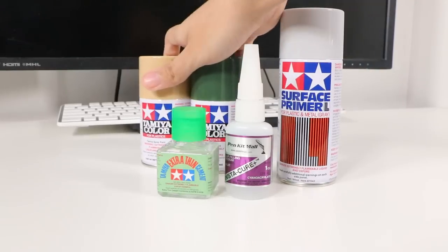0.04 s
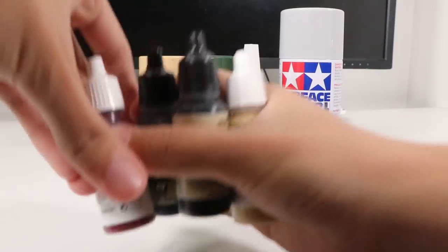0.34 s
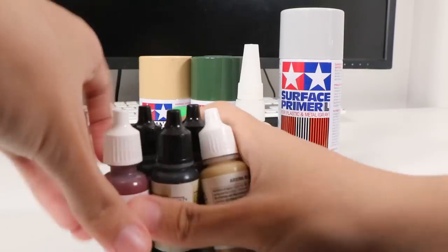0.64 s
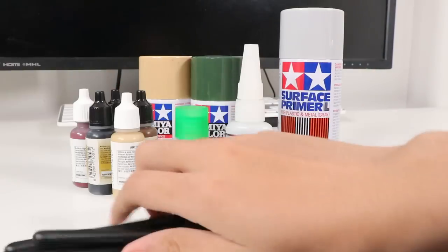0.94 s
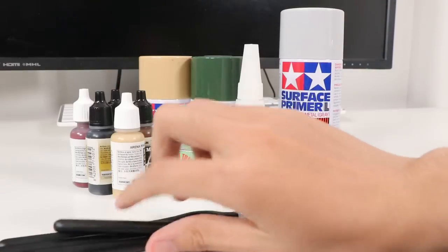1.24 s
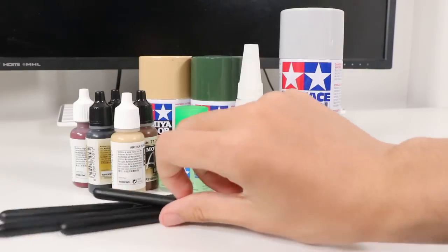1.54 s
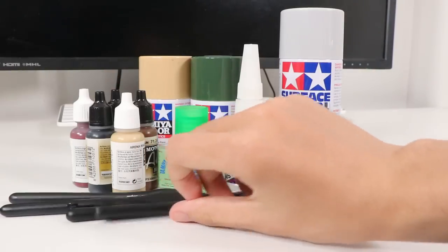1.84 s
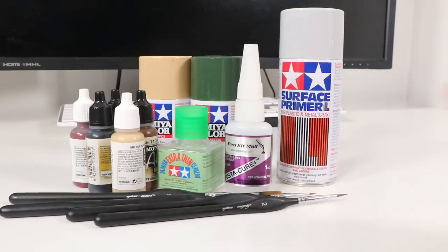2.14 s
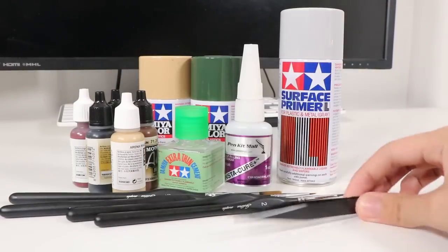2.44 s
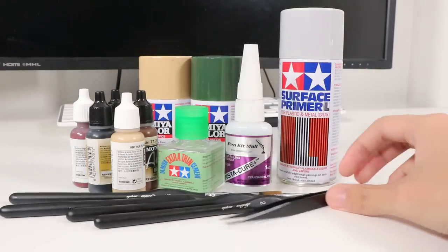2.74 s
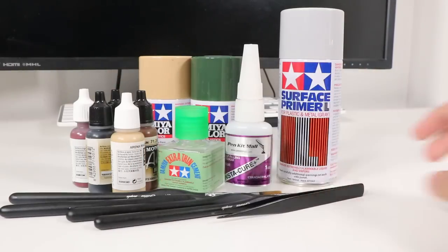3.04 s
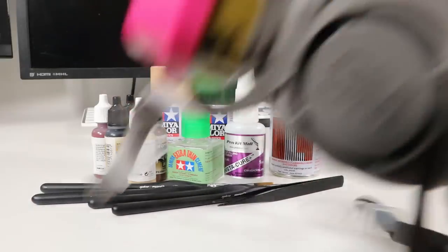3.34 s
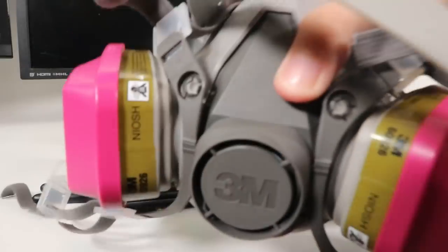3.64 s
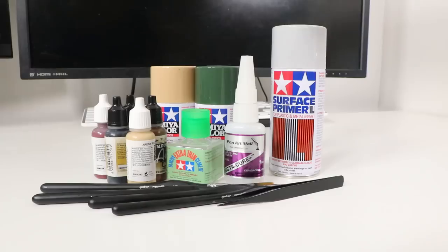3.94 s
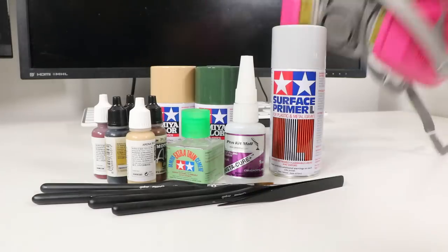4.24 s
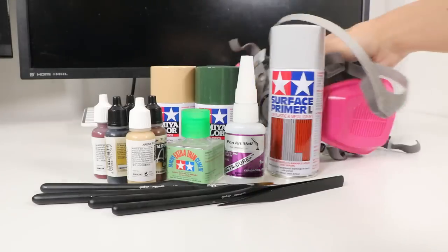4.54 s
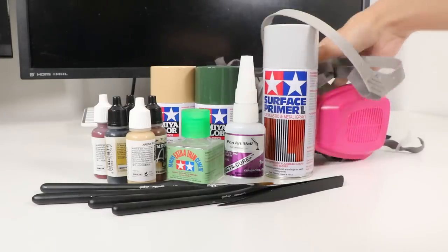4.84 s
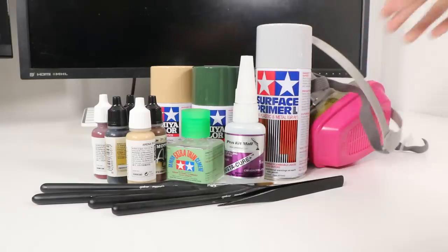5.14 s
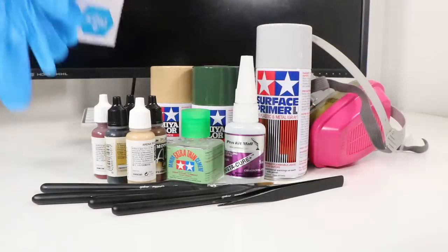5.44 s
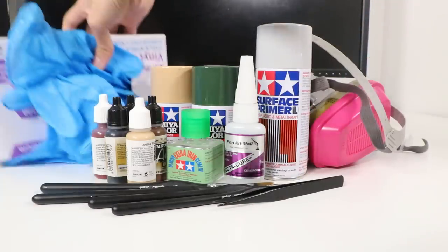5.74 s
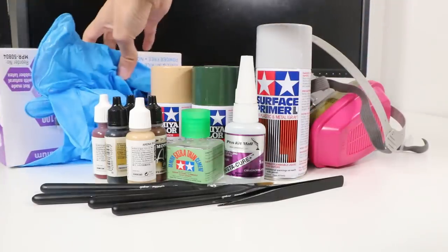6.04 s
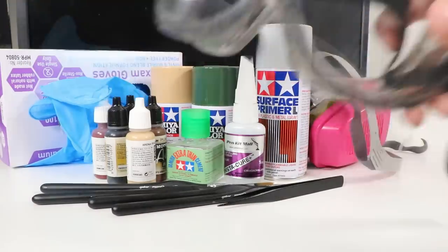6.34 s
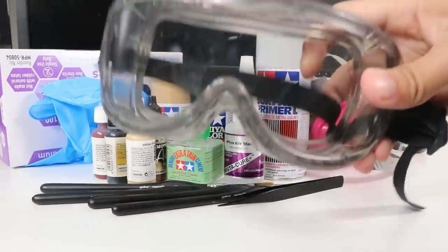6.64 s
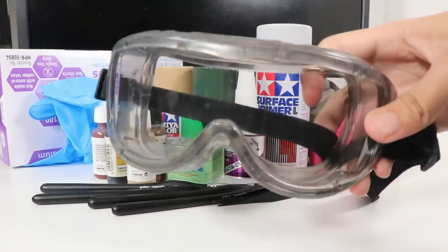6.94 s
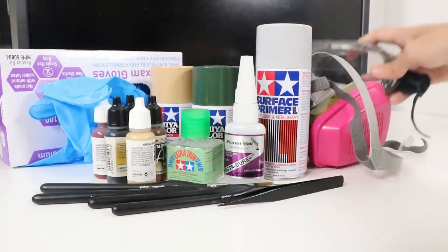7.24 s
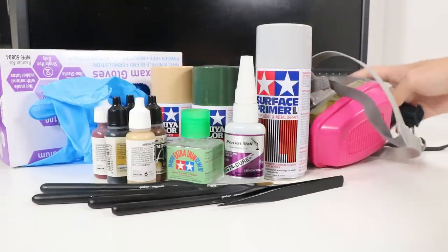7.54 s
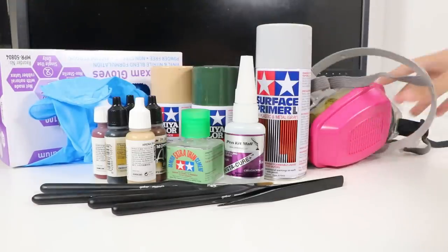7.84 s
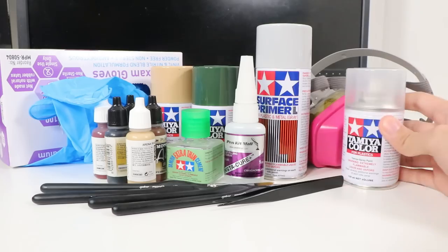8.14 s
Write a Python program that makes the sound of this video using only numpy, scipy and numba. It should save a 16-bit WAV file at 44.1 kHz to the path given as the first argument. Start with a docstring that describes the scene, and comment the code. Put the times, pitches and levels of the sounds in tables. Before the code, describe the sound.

Supplies are set on a desk near a stereo microphone in a small room, over quiet ventilation rumble. Light knocks open, then paint bottles land with a loud, dull double knock at 0.5 seconds and drag briefly. Around 1 second brush handles clatter down and slide, their metal ends ticking, with another clack near 1.9. Steel tweezers clack at 2.6, scrape and give a small high ping at 2.9. A plastic respirator taps and scrapes lightly around 3.4, then is put down from 4.4 to 5.1 with dry taps, a low drag and the hardest knock at 4.7. Rubber gloves rustle faintly until about 6.5, with a soft bump from their box at 5.8. Goggles bump and scrape lightly between 7.3 and 7.8. Just after 8 seconds a spray can's mixing ball clinks faintly, and the can knocks down at 8.2 with a short slide.

```python
"""Dull knocks on a desk come first, then brushes clatter and slide, as model-making supplies are set down
near a stereo microphone in a small room: paint bottles, brushes, tweezers, a respirator, a glove box,
goggles and a spray can. Each impact excites the damped modes of object and desk; sliding excites them
with many tiny slips. Ventilation rumbles underneath. A fast gain control flattens the room's tail
after each blow, and the first millisecond of the hardest ones clips."""
import sys
import numpy as np
from scipy import signal
from scipy.fft import rfft, irfft, next_fast_len
from scipy.io import wavfile
from numba import njit

SR = 44100
rng = np.random.default_rng(int(sys.argv[2]) if len(sys.argv) > 2 else 0)


def dump_mix(stems):
    """Bounce the given channels to the path in sys.argv[1] as a 16-bit WAV at rate SR."""
    frames = np.atleast_2d(stems).T  # one column per channel
    limited = np.clip(frames, -1, 1)  # hard clip at full scale
    pcm = np.round(limited * 32767).astype(np.int16)
    wavfile.write(sys.argv[1], SR, pcm)


N = 369999

# heavy things landing on the desk: (time [s], level [dB], centre [Hz], treble fall [dB/octave])
HEAVY_KNOCKS = [(.058, -5.5, 990, 15.5), (.076, -8.5, 590, 6.5), (.5065, 9, 420, 5.5),
                (.521, 13, 597, 11.5), (.655, -10, 380, 17), (4.562, -12.5, 480, 4), (4.630, 1.5, 382, 5.5),
                (4.7355, 19, 740, 9.5), (5.035, 0, 240, 8.5), (5.847, -11, 726, 8), (5.86, -19.5, 189, 10),
                (8.2139, 9, 1140, 11.5)]
# light impacts: (time [s], level [dB], treble fall [dB/octave])
HANDLE_CLACKS = [(.9374, 2.5, 5), (.9416, 4.5, 9.5), (.9857, 2.5, 5), (1.0086, 5, 7.5), (1.0615, 0.5, 20),
                 (1.9111, -13.5, 36), (1.9417, 1.5, 7), (1.9744, -10, 5.5)]  # brush handles dropping on the desk and on each other
TWEEZER_CLACKS = [(2.5834, 4.2, 14.1), (2.655, 6.7, 7.5), (2.687, 1.7, 8)]  # steel tweezers laid flat
TWEEZER_PINGS = [(2.873, -12.5, 4)]  # the tweezers as the fingers let go
PLASTIC_TAPS = [(3.3864, -3, 6), (3.4213, -5.5, 13.5), (3.6108, -12.5, 9.5), (4.2416, -22.5, 1),
                (4.3227, -20, 10), (4.415, -7.5, 5), (4.5816, 4, 9), (4.6759, 0.5, 6), (4.9393, 2, 18),
                (4.953, -2, 8.5), (4.9857, -1, 7.5), (5.642, -43.5, -1), (5.754, -38, 4)]  # respirator shells and buckles, gloves snapping
GOGGLE_BUMPS = [(7.312, -21.5, 7.5), (7.407, -27, 8.5), (7.429, -31.5, 3.5), (7.572, -29.5, 4),
                (7.6369, -9, 9.5), (7.7175, -16, 6), (7.7674, -15, 7)]  # the goggles' soft frame
BALL_CLINKS = [(.116, -31, 13), (8.0448, -32, 23), (8.138, -25, 1.6)]  # the mixing ball in the spray can
# metal brush ferrules ticking: (time [s], level [dB], treble fall [dB/octave], chatter length [s])
FERRULE_TICKS = [(.907, -20, 16, 0), (1.0855, -6, 4, 0), (1.2012, -13, 25, 0), (1.299, -15, 17, .045),
                 (1.4357, -1, 10, 0), (1.558, -7, 1.5, 0), (1.7485, -0.5, 8, .055)]

# the brushes pushed across the desk in one long move: (time [s], level of the handles' rub [dB])
BRUSH_SLIDE = [(.96, -13.5), (1.05, -9), (1.25, -20), (1.33, -18), (1.41, -10), (1.52, -14.5), (1.66, -20),
               (1.762, -5.5), (1.87, -20.5), (2.021, -14), (2.119, -40.5)]
# low, dull rubs of things sliding on the desk: (start [s], length [s], level [dB], centre [Hz])
LOW_DRAGS = [(0, 0.063, -22.5, 480), (0.474, 0.028, -35.5, 220), (0.549, .17, -11, 373),
             (0.696, 0.135, -26.5, 183), (2.799, 0.098, -28.5, 328), (4.765, 0.3, -12.5, 360),
             (5.02, 0.11, -9.5, 354), (7.413, 0.05, -35, 170), (8.25, 0.13, -20, 810)]
# light plastic and steel scraping to rest: (start [s], length [s], level [dB])
LIGHT_SCRAPES = [(2.7, 0.23, -18), (3.427, 0.14, -15), (3.608, 0.17, -31.5), (4.44, 0.16, -18.5),
                 (4.988, 0.15, -13), (7.351, 0.28, -42), (7.638, 0.11, -21.5)]
# hands, straps and rubber gloves rustling: (start [s], length [s], level [dB], centre [Hz])
HAND_RUSTLES = [(0.202, .3, -53, 260), (2.15, 0.18, -54.5, 264), (2.323, 0.25, -45.5, 2050),
                (2.952, .11, -46, 3220), (3.209, 0.18, -46.5, 1880), (3.879, 0.083, -49, 820),
                (5.1, 1, -52, 5670), (5.436, 0.126, -46.5, 330), (6.028, 0.2, -42.5, 1240),
                (6.3, 0.197, -51.5, 1560), (7.161, .1, -48, 298), (7.965, 0.31, -46.5, 3280)]

# normal modes: (frequency [Hz], bandwidth [Hz], level over the plain contact [dB])
DESK_MODES = [(134.3, 7.3, 13), (220, 15, -5), (293, 8.4, -15), (347.5, 27, 10), (423, 15, 4),
              (498, 49, -1), (573, 15.3, 0.5), (820, 21, -4.5), (1130, 8, -10), (1191, 10, 0.5)]
LOADED_DESK_MODES = [(118, 20, 7.5), (277.6, 4.2, 5.5), (572, 19, -3.5), (1120, 840, -11)]  # further modes under a heavy thing
HANDLE_MODES = [(1640, 89, 0), (2370, 140, 4), (2610, 124, 7), (2820, 100, 10.5), (3500, 31, -23),
                (5440, 610, 0), (7360, 290, 5)]
FERRULE_MODES = [(3920, 160, 10.2), (4214, 200, 18), (7300, 1200, 9.9), (7800, 150, 3), (9300, 340, 11),
                 (9960, 190, 12.3)]
HELD_TWEEZER_MODES = [(1260, 80, -10.5), (1600, 220, 4.5), (2085, 60, -6), (2380, 180, 8), (2960, 270, -3)]
FREE_TWEEZER_MODES = [(3130, 23, 21), (4320, 20, 32.6), (4340, 17, 27), (5800, 13, 9), (7120, 33, 29.7),
                      (7500, 40, 7.2), (8180, 50, 10), (9520, 36, 19)]
PLASTIC_MODES = [(1680, 110, -24), (2400, 630, -1), (3840, 400, -51)]
GOGGLE_MODES = [(553, 39, 10.5), (1240, 58, -18), (1560, 120, -12)]
CAN_MODES = [(3370, 33, 32), (3690, 210, 20), (4400, 29, 5.1), (5950, 58, 13), (7070, 38, 7.1),
             (8300, 57, 20), (10800, 36, 17), (12600, 110, 6.2)]

# reverberation of the room: (frequency [Hz], time to decay by 60 dB [s])
ROOM_DECAY = [(120, 0.28), (500, 0.23), (2000, 0.31), (5000, 0.27), (14000, 0.32)]
# steady room noise: (frequency [Hz], relative spectral density [dB])
AIR_SPECTRUM = [(15, -37.5), (25, -14), (76, -1), (127, -13), (242, -8.5), (489, -16), (863, -19),
                (1020, -19), (1190, -20.5), (1440, -18), (1840, -19), (2050, -19), (3720, -24), (8590, -27),
                (16000, -38.5)]


def heavy_knocks():
    """Impact excitation: heavy things drive the low modes of the loaded desk."""
    return blows(HEAVY_KNOCKS, LOADED_DESK_MODES, pan_db=2.86, scatter_db=12, scatter_s=.015, rise=6.9)


def handle_clacks():
    """Modal ringing: falling brush handles sound their broad, quickly damped modes."""
    hits = struck(HANDLE_CLACKS, centre_hz=2660)
    return blows(hits, HANDLE_MODES, pan_db=-2.4, scatter_db=9, scatter_s=.006, rise=6.7)


def tweezer_clacks():
    """Damping: steel tweezers held in the fingers clack without ringing on."""
    hits = struck(TWEEZER_CLACKS, centre_hz=1650)
    return blows(hits, HELD_TWEEZER_MODES, pan_db=-1, scatter_db=12.5, scatter_s=.011, rise=7.6)


def plastic_taps():
    """Internal loss: the modes of plastic die at once, leaving a dry tap."""
    hits = struck(PLASTIC_TAPS, centre_hz=2220)
    return blows(hits, PLASTIC_MODES, pan_db=-2, scatter_db=11, scatter_s=.008, rise=6.2)


def goggle_bumps():
    """Scattering: the goggles' soft frame smears each bump, so little of it arrives as a sharp click."""
    hits = struck(GOGGLE_BUMPS, centre_hz=1760)
    return blows(hits, GOGGLE_MODES, pan_db=-2, scatter_db=22, scatter_s=.01, rise=7.5)


def ferrule_ticks(gap_s=.014, rebound_db=-7.5, fade_db_per_s=83):
    """Inelastic rebound: ferrules tick together, some chattering on in ever weaker bounces."""
    ticks = []
    for s, db, fall, length in FERRULE_TICKS:
        delays = np.cumsum(gap_s * (1 + .2 * rng.uniform(-1, 1, 8)))
        ticks.append((s, db, fall))
        ticks += [(s + d, db + rebound_db - fade_db_per_s * d, fall) for d in delays if d < length]
    hits = struck(ticks, centre_hz=6030)
    return blows(hits, FERRULE_MODES, pan_db=4, scatter_db=8.5, scatter_s=.012, rise=4.2)


def tweezer_ping():
    """Free vibration: once released, the tweezers ring in narrow, high modes."""
    hits = struck(TWEEZER_PINGS, centre_hz=6800)
    return blows(hits, FREE_TWEEZER_MODES, pan_db=6.5, scatter_db=21, scatter_s=.0012, rise=11.3)


def can_clinks():
    """Shell resonance: the mixing ball rings the wall of the spray can."""
    hits = struck(BALL_CLINKS, centre_hz=8600)
    return blows(hits, CAN_MODES, pan_db=-3.5, scatter_db=35, scatter_s=.0026, rise=28)


def struck(table, centre_hz, db_per_octave=34.5):
    """Contact time: a harder blow is briefer, hence brighter; centre_hz holds at 0 dB."""
    return [(s, db, centre_hz * 2 ** (db / db_per_octave), fall) for s, db, fall in table]


def blows(table, modes, pan_db, scatter_db, scatter_s, rise, clutter_db=3, scatter_hz=5000, size=12288):
    """Source and filter: an impulse and its short scatter ring the modes of object and desk."""
    out, t, f = np.zeros((2, N)), np.arange(size) / SR, bins(size)
    ring = resonances(f, DESK_MODES + modes)
    fade = np.minimum(10 * (1 - t / t[-1]), 1)
    # pan_db is left minus right; the push reaches the weaker, farther microphone later
    lag_s = np.round(np.clip([[-pan_db], [pan_db]], 0, 4) * 1.5) / SR
    for s, db, centre_hz, fall in table:
        shudder = rng.standard_normal(size)  # the desk top, alike at both microphones
        clutter = undb(clutter_db) * diffuse(rng.standard_normal((2, size)))
        scatter = unit(rfft((shudder + clutter) * np.exp(-t / scatter_s))) / np.hypot(1, f / scatter_hz)
        push = np.exp(-2j * np.pi * f * lag_s) + undb(scatter_db) * scatter
        hit = irfft(push * contact(size, centre_hz, fall, rise) * ring) * fade
        hit *= np.sqrt(.01 * SR / np.mean(np.sum(hit ** 2, axis=1)))  # energy of 10 ms at rms 1
        add(out, s, hit * undb([[db + pan_db / 2], [db - pan_db / 2]]))
    return out


def contact(size, centre_hz, fall, rise, knee=3.5, top_hz=11500):
    """Contact spectrum: small things radiate little bass, soft ones little treble (slopes in dB/octave)."""
    octaves = np.log2(np.hypot(bins(size), 20) / centre_hz)
    db = -(rise * np.logaddexp(0, -knee * octaves) + fall * np.logaddexp(0, knee * octaves)) / knee
    db -= 10 * np.log10(1 + (bins(size) / top_hz) ** 4)
    # minimum phase: nothing sounds before the touch
    cepstrum = irfft(np.log(undb(db)))
    cepstrum[1:size // 2] *= 2
    cepstrum[size // 2 + 1:] = 0
    return np.exp(rfft(cepstrum))


def resonances(f, modes):
    """Modal superposition: damped oscillators add to the plain contact."""
    return 1 + sum(undb(db) / (1 + 1j * (f ** 2 - hz ** 2) / (f * width)) for hz, width, db in modes)


def short_slides():
    """Sliding friction: low drags, light scrapes and faint crackly rustles sound through the desk."""
    out = np.zeros((2, N))
    for s, length, db, centre_hz in LOW_DRAGS:
        pressure = stroke(length, db, fade_db_per_s=21)
        add(out, s, friction(pressure, DESK_MODES, centre_hz, fall=6.72, rise=3.9))
    for s, length, db in LIGHT_SCRAPES:
        pressure = stroke(length, db, fade_db_per_s=39)
        add(out, s, friction(pressure, DESK_MODES, centre_hz=1670, fall=10.8, rise=5.5, grain_db=2))
    for s, length, db, centre_hz in HAND_RUSTLES:
        pressure = stroke(length, db, fade_db_per_s=-1)
        add(out, s, friction(pressure, DESK_MODES, centre_hz, fall=7, rise=6.9, grain_db=2.5))
    return out


def brush_slide():
    """Friction under load: the ferrules' thin scrape grows as the square of the handles' rub."""
    out = np.zeros((2, N))
    s, db = np.transpose(BRUSH_SLIDE)
    rub = undb(np.interp(np.arange(s[0], s[-1], 1 / SR), s, db))
    scrape = undb(2.5) * rub ** 2
    add(out, s[0], friction(rub, DESK_MODES, centre_hz=1940, fall=13, rise=5.67))
    add(out, s[0], friction(scrape, FERRULE_MODES, centre_hz=6300, fall=13, rise=9, grain_db=3.5))
    return out


def stroke(length, db, fade_db_per_s):
    """Pressure envelope of one move: it eases in and out, and fades if the thing slows."""
    t = np.arange(max(int(length * SR), 8)) / SR
    return undb(db) * unit(signal.windows.tukey(len(t), .49) * undb(-fade_db_per_s * t))


def friction(pressure, modes, centre_hz, fall, rise, grain_db=1, catch_db=2.5, catch_s=.01):
    """Stick-slip: tiny uneven slips come in bouts as surfaces catch, as strong as the pressure."""
    size = 8192 * (len(pressure) // 8192 + 2)
    t = np.arange(size) / SR
    pressure = np.pad(pressure, (0, size - len(pressure)))
    noise = rng.standard_normal((2, size))
    grains = undb(grain_db * np.repeat(rng.exponential(size=size // 32), 32))
    catches = undb(catch_db * np.interp(t / catch_s, np.arange(size), rng.standard_normal(size)))
    slips = diffuse(noise * grains) * catches * pressure
    rub = irfft(rfft(slips) * contact(size, centre_hz, fall, rise) * resonances(bins(size), modes))
    return unit(rub) * np.sqrt(np.mean(pressure ** 2))


def room(x, build_s=.009, dull_hz=7000, size=32768):
    """Reverberation: dense reflections build up, then decay exponentially at each band's own rate."""
    t, f = np.arange(size) / SR, bins(size)
    hz, t60 = np.transpose(ROOM_DECAY)
    noise = rfft(diffuse(rng.standard_normal((2, size)))) / np.hypot(1, f / dull_hz)
    bands = [irfft(noise * np.interp(np.log(f), np.log(hz), weights)) for weights in np.eye(len(hz))]
    tail = sum(band * undb(-60 * t / decay_s) for band, decay_s in zip(bands, t60))
    tail *= 1 - np.exp(-t / build_s)
    return signal.fftconvolve(x.mean(axis=0)[None], unit(tail) / np.sqrt(size), axes=1)[:, :N]


def air(level_db=-50):
    """Stationary noise: low ventilation rumble and an even hiss."""
    size = 2 * next_fast_len(N // 2 + 1)
    hz, db = np.transpose(AIR_SPECTRUM)
    colour = undb(np.interp(np.log(bins(size)), np.log(hz), db))
    noise = rfft(diffuse(rng.standard_normal((2, size))))
    return unit(irfft(noise * colour)[:, :N]) * undb(level_db)


def diffuse(pair, spacing_m=.1):
    """Diffuse-field coherence: two microphones receive alike bass and unrelated treble."""
    coherence = np.sinc(2 * bins(pair.shape[1]) * spacing_m / 343)
    mid, side = rfft(pair)
    mid, side = mid * np.sqrt((1 + coherence) / 2), side * np.sqrt((1 - coherence) / 2)
    return irfft(np.array([mid + side, mid - side]))


def undb(db):
    """Decibels to amplitude ratio."""
    return 10 ** (np.asarray(db) / 20)


def unit(x):
    """Normalisation to rms 1."""
    return x / np.sqrt(np.mean(abs(x) ** 2))


def add(out, s, sound):
    """Superposition: mix a sound in from time s."""
    i = max(int(s * SR), 0)
    out[:, i:i + sound.shape[1]] += sound[:, :N - i]


def bins(size):
    """Fourier frequencies of a signal this long, at least 1 Hz."""
    return np.maximum(np.fft.rfftfreq(size, 1 / SR), 1)


@njit
def follow(x, attack, release):
    """Envelope detection with separate rise and fall rates."""
    out, level = np.empty(len(x)), 0.
    for i in range(len(x)):
        level += (x[i] - level) * (attack if x[i] > level else release)
        out[i] = level
    return out


def scene():
    """Superposition of direct sound, reverberation and room noise."""
    knocks = heavy_knocks()
    clatter = handle_clacks() + tweezer_clacks() + plastic_taps() + goggle_bumps()
    rings = ferrule_ticks() + tweezer_ping() + can_clinks()
    rubs = short_slides() + brush_slide()
    reverb = room(undb(-6) * knocks + undb(-2.5) * clatter + undb(-7) * rubs)
    return knocks + clatter + rings + rubs + reverb + air()


def record(dry, threshold_db=-29, ratio=2.47, attack_s=.0072, release_s=.059, top_hz=15900):
    """Compression: gain drops just after each blow; what slips past clips, and all is low-passed."""
    level = follow(abs(dry).mean(axis=0), 1 / (attack_s * SR), 1 / (release_s * SR))
    gain = np.maximum(level / undb(threshold_db), 1) ** (1 / ratio - 1)
    clipped = np.clip(dry * gain, -1, 1)
    return signal.sosfilt(signal.ellip(8, .2, 70, top_hz, fs=SR, output="sos"), clipped)


dry = scene()
out = record(dry)
dump_mix(out)
```